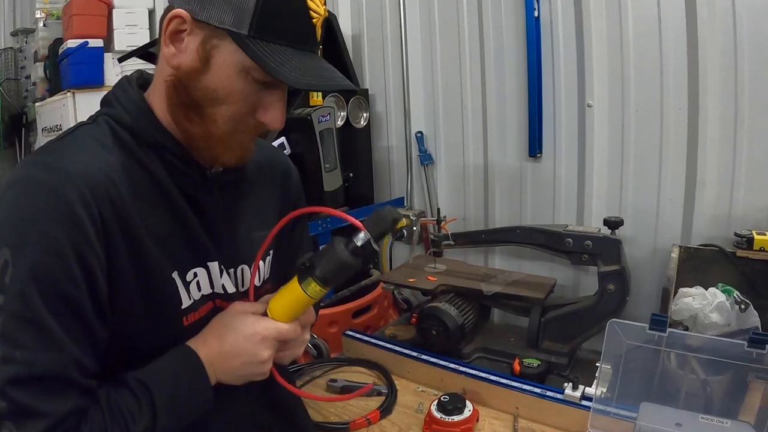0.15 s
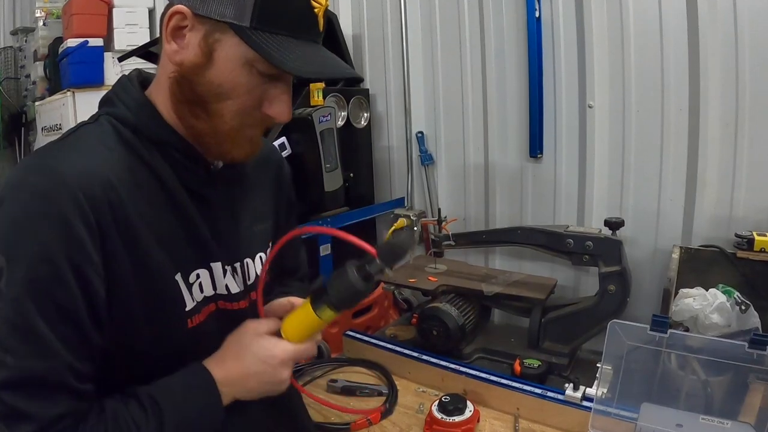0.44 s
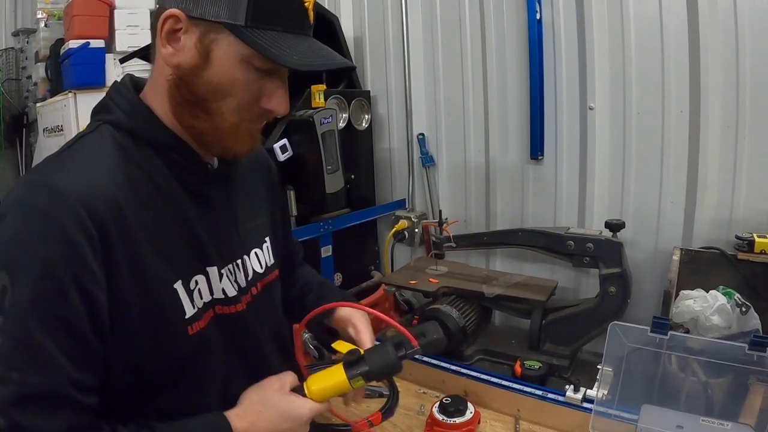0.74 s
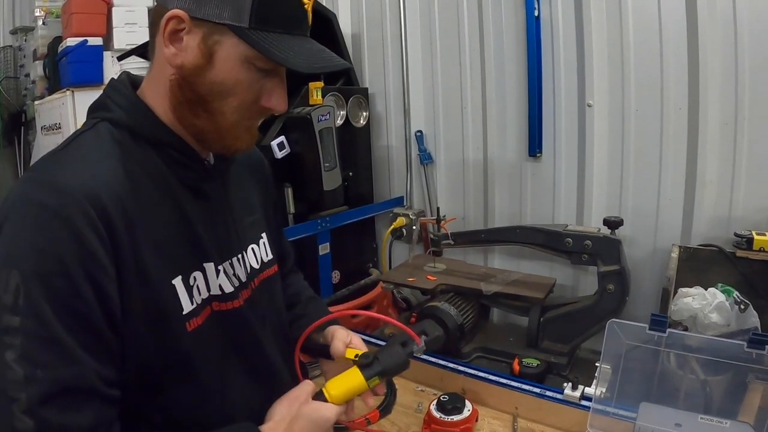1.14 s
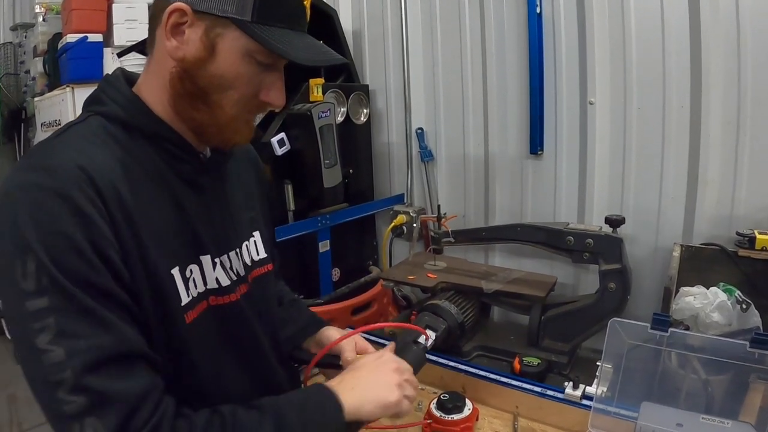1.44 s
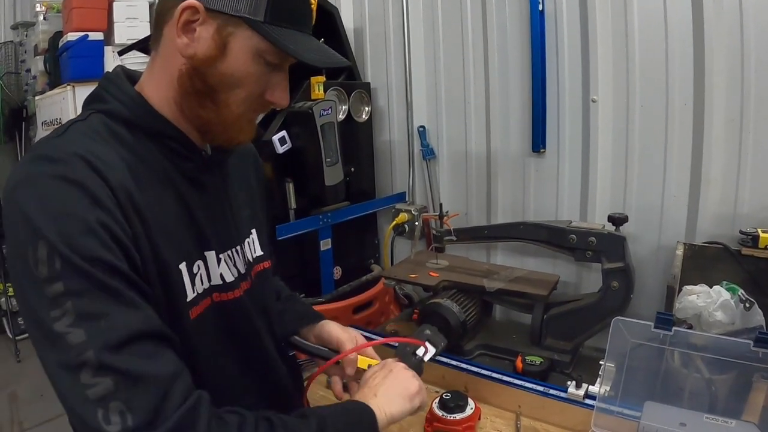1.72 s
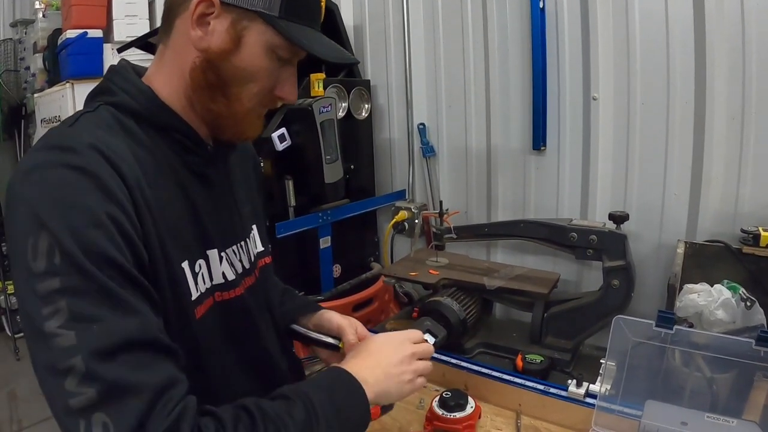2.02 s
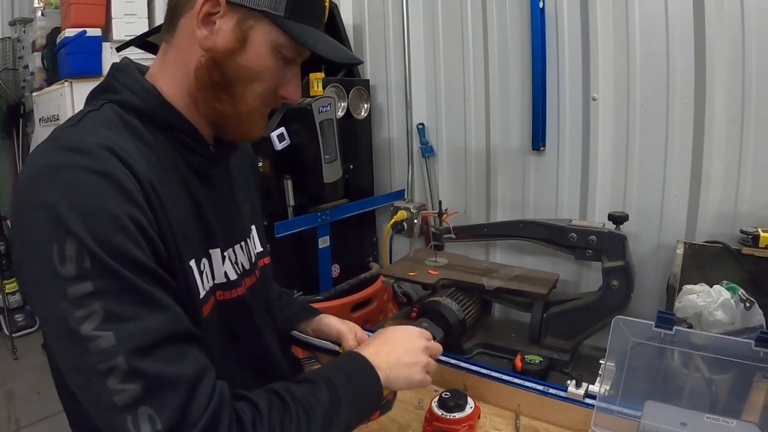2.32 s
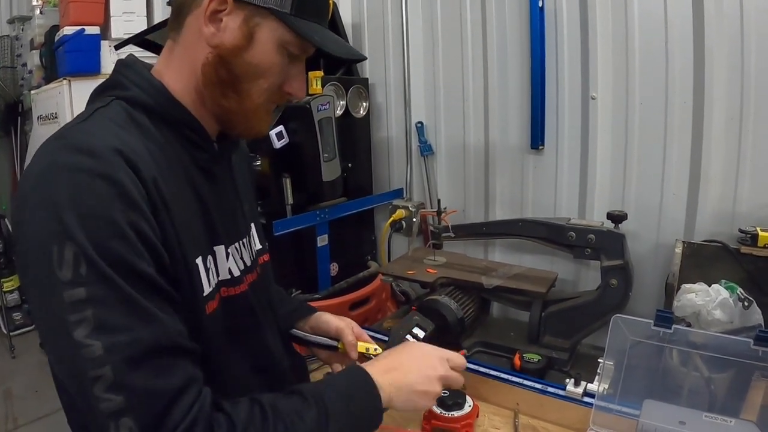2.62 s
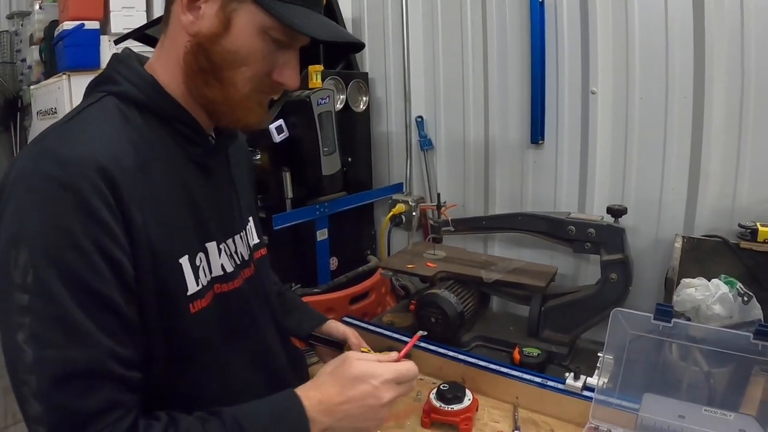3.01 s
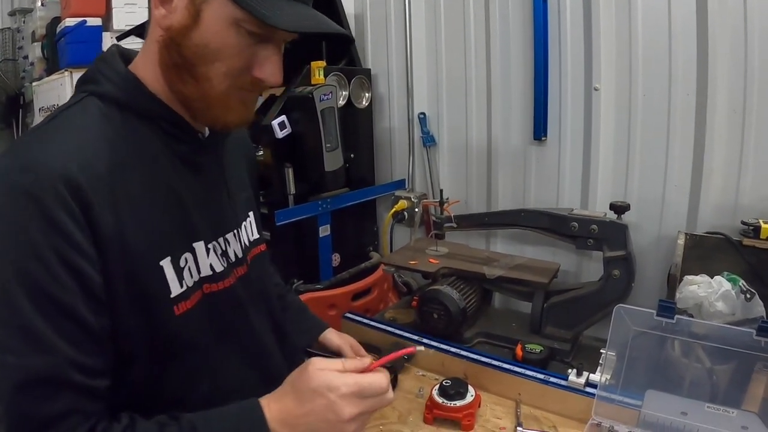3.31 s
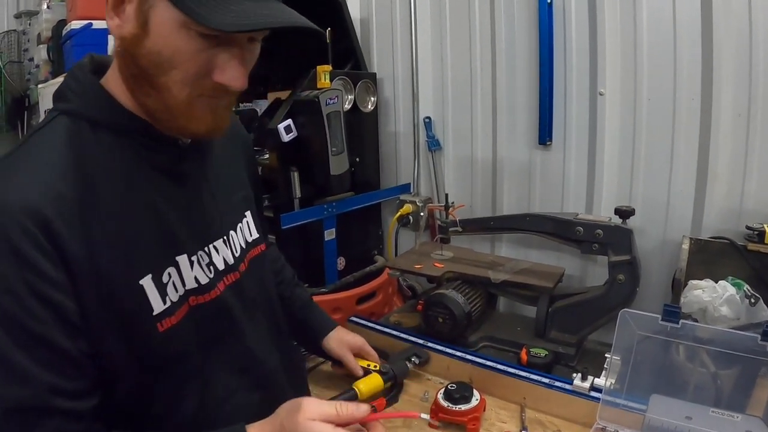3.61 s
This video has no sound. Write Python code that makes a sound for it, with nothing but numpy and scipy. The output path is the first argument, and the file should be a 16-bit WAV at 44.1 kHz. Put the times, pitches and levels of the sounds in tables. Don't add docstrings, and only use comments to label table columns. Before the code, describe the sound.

A hydraulic hand crimper clicks, clacks sharply, squeals on release, then clanks on a wooden bench

```python
import sys
import numpy as np
from scipy import signal
from scipy.fft import rfft, irfft
from scipy.io import wavfile
from scipy.ndimage import uniform_filter1d, map_coordinates

SR = 44100
rng = np.random.default_rng(int(sys.argv[2]) if len(sys.argv) > 2 else 0)


def invert_db(x):
    u = np.asarray(x, float) / 20
    return 10 ** u


def materialize(psi):
    bounded = np.clip(np.atleast_2d(psi).T, -1, 1)
    quanta = np.round(bounded * 32767).astype(np.int16)
    wavfile.write(sys.argv[1], SR, quanta)


N = 165375
TIME = np.arange(N) / SR


def on_log(table, hz):
    table = np.array(table)
    return np.interp(np.log(hz), np.log(table[:, 0]), table[:, 1])


def unit(x):
    return x / np.sqrt(np.mean(x ** 2))


def walk(rate):
    k = int(SR / rate)
    steps = np.repeat(rng.standard_normal(N // k + 1), k)
    return 1.2 * uniform_filter1d(uniform_filter1d(steps, k), k)[:N]


def bands(size, step):
    f = np.fft.rfftfreq(size, 1 / SR) + 1
    for hz in 25 * 2 ** np.arange(0, 9.4, step):
        power = np.maximum(1 - np.abs(np.log2(f / hz)) / step, 0)
        yield hz, irfft(rfft(rng.standard_normal(size)) * np.sqrt(power), size)


def ring(modes, crack, tilt_db, ring_scale, crack_db, crack_cycles, vary_db):
    t = np.arange(int(0.25 * SR)) / SR
    mode_hz, width, mode_db = np.array(modes, float).T
    crack_hz = np.geomspace(crack[0][0], min(crack[-1][0], 0.4 * SR), num=40)
    detune, vary, sign = rng.standard_normal((3, len(mode_hz) + 40))

    decay = np.r_[np.pi * width / ring_scale, crack_hz / crack_cycles + 150]
    spread = np.r_[np.full(len(mode_hz), 0.008), np.full(40, 0.04)]
    f = np.r_[mode_hz, crack_hz] * (1 + spread * detune)

    db = np.r_[mode_db - mode_db.max(), on_log(crack, crack_hz) + crack_db]
    strongest_hz = mode_hz[mode_db.argmax()]
    db = db + vary_db * vary + tilt_db * np.log2(f / strongest_hz)
    gain = invert_db(db) * np.sqrt(decay) * np.r_[np.sqrt(width), np.sqrt(crack_hz / 8)] * np.sign(sign)
    return gain @ (np.exp(-decay[:, None] * t) * np.sin(2 * np.pi * f[:, None] * t))


def hits(events, modes, crack, ring_scale, crack_db, crack_cycles, vary_db, rattle_s):
    out = np.zeros(N + SR)
    for s, db, tilt_db in events:
        when, size = rng.random((2, 6))
        push = np.zeros(SR // 20)
        push[0] = 0.65
        chatter_at = (rattle_s * 2 * when * SR).astype(int)
        np.add.at(push, chatter_at, (2 * size - 1) * np.exp(-2 * when))
        body = ring(modes, crack, tilt_db, ring_scale, crack_db, crack_cycles, vary_db)
        y = signal.fftconvolve(push, body)
        i = int(s * SR)
        out[i:i + len(y)] += y * invert_db(db) / np.abs(y).max()
    return out[:N]


# (frequency [Hz], density [dB per Hz])
SHED_AIR = [(15, -50), (25, -20.5), (164, -6), (460, -26.5), (616, -15.5), (1190, -12), (2500, -21.5),
            (12300, -45.5), (14000, -57.5)]
# (frequency [Hz], level [dB])
FAN_HUM = [(120, -67), (157, -74.5)]


def shed_murmur():
    swell = walk(1.9)
    air = 0
    for hz, noise in bands(N, 1 / 2):
        air = air + invert_db(on_log(SHED_AIR, hz) + 0.46 * swell + 3.0 * walk(22)) * noise
    hum = 0
    for hz, db in FAN_HUM:
        hum = hum + invert_db(db + 0.5 + 2.2 * walk(15)) * np.sin(2 * np.pi * hz * TIME)
    return unit(air) * invert_db(-60.5) + hum


# (time [s], peak level [dB], tilt [dB per octave])
PUMP_CLICKS = [(0.5563, -20.5, 4), (0.5633, -30.5, 0), (0.5766, -25, -1.5), (0.5844, -33.5, -3),
               (0.5916, -20, -2), (0.5975, -23.5, 3), (0.6761, -26, -0.5), (0.6831, -28.5, -9),
               (0.6882, -28.5, -3.5), (0.7199, -34, 4), (0.781, -55, 1.5), (1.2358, -32.5, 5.5),
               (1.2464, -27, -3), (1.2945, -40, 3.5), (1.736, -36.5, 0.5), (1.7856, -45, -6),
               (2.4823, -32.5, -8.5), (3.2957, -21, -18), (3.513, -20.5, -13), (3.6016, -28.5, -6),
               (3.6174, -32.5, -6.5), (3.713, -33, -5), (3.7272, -36.5, -7)]
# (frequency [Hz], width [Hz], level [dB])
PUMP_MODES = [(1286, 130, -1), (1808, 29, 1.5), (2610, 70, 1), (4000, 54, -10.5), (4470, 170, -5.5),
              (4850, 44, -5), (5006, 92, -1.5), (9400, 91, -19.5)]
# (frequency [Hz], density [dB per Hz])
PUMP_CRACK = [(290, -32.5), (500, -16.5), (4540, -1), (11400, -41), (15000, -57)]


def pump_clicks():
    return hits(PUMP_CLICKS, PUMP_MODES, PUMP_CRACK, ring_scale=1.3, crack_db=-7.5, crack_cycles=6.5,
                vary_db=7.9, rattle_s=0.0023)


# (time [s], peak level [dB], tilt [dB per octave])
DIE_CLACKS = [
    (0.9634, -27.5, 0),
    (0.9703, -9, 0),
    (0.9753, -6, 0),
    (0.9776, -2.5, 0),
    (1.072, -23, 0),
]
# (frequency [Hz], width [Hz], level [dB])
DIE_MODES = [(1817, 87, -27), (3144, 47, 4), (3763, 81, 4), (4230, 30, -1.5), (4330, 31, -8.5),
             (4440, 100, -2), (5084, 35, -8.5), (5780, 72, -8), (6300, 24, -12), (6900, 45, -9),
             (8500, 160, -23.5), (10930, 37, -17)]
# (frequency [Hz], density [dB per Hz])
DIE_CRACK = [(180, -63.5), (300, -40), (1820, -9.5), (2360, -30.5), (4390, -4), (15000, -47)]


def die_clacks():
    return hits(DIE_CLACKS, DIE_MODES, DIE_CRACK, ring_scale=0.92, crack_db=-11.0, crack_cycles=11.0,
                vary_db=6.1, rattle_s=0.004)


# (time [s], peak level [dB], tilt [dB per octave])
HANDLE_KNOCKS = [(1.077, -49, 0), (1.246, -41, 0), (2.185, -6, 0.0032), (2.197, -18, 0.0076),
                 (2.356, -20, 0), (2.565, -9.5, 0), (2.657, -5.5, 0.045), (2.787, -27, 0), (3.272, -8, 0),
                 (3.356, -9.5, 0), (3.365, -31, 0), (3.512, -15, 0), (3.668, -28.5, 0), (3.685, -25, 0)]
# (frequency [Hz], width [Hz], level [dB])
HANDLE_MODES = [(570, 14.6, 7), (1625, 48, -23), (1724, 21, -17), (2445, 65, -24.5), (2785, 19.5, -10),
                (3390, 86, -33)]
# (frequency [Hz], density [dB per Hz])
HANDLE_CRACK = [(120, -27), (200, -19), (561, 4), (2530, -21.5), (10000, -73), (13000, -83), (22000, -120)]


def handle_knocks():
    return hits(HANDLE_KNOCKS, HANDLE_MODES, HANDLE_CRACK, ring_scale=0.49, crack_db=-14.0, crack_cycles=7.3,
                vary_db=2.14, rattle_s=0.004)


# (time [s], pitch [Hz], whistle level [dB], hiss level [dB])
VALVE = [
    (1.974, 651, -76.5, -72),
    (1.99, 623, -36.5, -41),
    (2.002, 912, -46.5, -42.5),
    (2.018, 868, -32.5, -42.5),
    (2.032, 543, -26, -31.5),
    (2.061, 467, -32, -37),
    (2.1, 485, -43.5, -39.5),
    (2.14, 437, -73, -43.5),
    (2.229, 433, -96, -61),
]
# (frequency [Hz], density [dB per Hz])
OIL_JET = [(710, -59), (1200, -8), (2950, -11), (5160, 0), (9320, -7), (15000, -42)]
# (time [s], pitch [Hz], level [dB])
SEAT_CHIRPS = [
    (1.2, 1400, -28),
    (3.8, 770, -35),
    (1.992, 5900, -43),
    (2.03, 5200, -24),
]


def release_valve():
    s, hz, whistle_db, hiss_db = np.array(VALVE).T
    pitch = uniform_filter1d(np.interp(TIME, s, hz), size=200) * (1 + 0.015 * walk(99))
    phase = 2 * np.pi * np.cumsum(pitch) / SR
    whistle = np.sin(phase) + invert_db(-22.5) * np.sin(1.7 * phase)
    whistle = whistle * invert_db(np.interp(TIME, s, whistle_db, -140, -140) + 3 + 1.0 * walk(80))

    hiss = 0
    for band_hz, noise in bands(N, 1 / 2):
        if band_hz > 900:
            hiss = hiss + invert_db(on_log(OIL_JET, band_hz) + 2.2 * walk(59.72)) * noise
    hiss = unit(hiss)
    fall_per_s = 1.3
    lag = SR / 620 * (1 + fall_per_s * np.clip(TIME - s[0], 0, 1))
    for turn in (1, 2):
        hiss = hiss + invert_db(-10) * map_coordinates(hiss, [np.arange(N) - turn * lag], order=3, mode="mirror")
    hiss = unit(hiss) * invert_db(np.interp(TIME, s, hiss_db, -140, -140))

    chirps, chirp_s = 0, 0.0052
    for at, chirp_hz, db in SEAT_CHIRPS:
        swell = np.exp(-((TIME - at) / chirp_s) ** 2)
        chirps = chirps + invert_db(db) * swell * np.sin(2 * np.pi * chirp_hz * TIME)
    return whistle + chirps + hiss


# (time [s], rubbing level [dB])
ROLL = [(2.15, -78), (2.2, -30.5), (2.36, -29), (2.41, -50), (2.5, -31), (2.8, -57), (3.1, -63),
        (3.22, -35), (3.4, -29), (3.48, -45), (3.6, -33.5), (3.75, -46)]


def rolling():
    ticks_per_s = 200
    ticking = rng.random(N) < ticks_per_s / SR
    ticks = ticking * invert_db(6.9 * rng.exponential(size=N)) * np.sign(rng.standard_normal(N))
    bench = ring(BENCH_MODES, BENCH_CRACK, tilt_db=1.0, ring_scale=1.0, crack_db=0.0, crack_cycles=9.8,
                 vary_db=0.61)
    handle = ring(HANDLE_MODES, HANDLE_CRACK, tilt_db=-0.97, ring_scale=0.82, crack_db=0.0, crack_cycles=6.2,
                  vary_db=1.5)
    body = unit(bench) + invert_db(-14.5) * unit(handle)
    s, db = np.array(ROLL).T
    return unit(signal.fftconvolve(ticks, body)[:N]) * invert_db(np.interp(TIME, s, db, -140))


# (time [s], peak level [dB], tilt [dB per octave])
HEAD_CLANKS = [
    (2.163, -11.5, 0),
    (2.54, -6, 0.007),
    (2.585, -12, 0.0096),
    (2.887, -6, 0),
    (2.898, -10, 0),
]
# (frequency [Hz], width [Hz], level [dB])
HEAD_MODES = [(1194, 45, 3), (1615, 16, -17), (2600, 210, -9.5), (3298, 62, -13), (3472, 72, -14.5),
              (3897, 89, -11.5), (4700, 390, -16.5), (5800, 53, -24.5), (6790, 43, -24.5),
              (7230, 140, -26.5)]
# (frequency [Hz], density [dB per Hz])
HEAD_CRACK = [(180, -37), (300, -22.5), (1210, -2.5), (10500, -42), (15000, -73)]


def head_clanks():
    return hits(HEAD_CLANKS, HEAD_MODES, HEAD_CRACK, ring_scale=0.66, crack_db=-11.5, crack_cycles=6.2,
                vary_db=3.3, rattle_s=0.0055)


# (time [s], peak level [dB], tilt [dB per octave])
BENCH_THUDS = [(2.167, -23.5, 0), (2.215, -30, 0), (2.271, -16.5, 0.045), (2.302, -20, 0.045),
               (2.328, -24.5, 0), (2.442, -35.5, 0.011), (2.549, -20, 0), (2.566, -22.5, 0),
               (2.885, -13, 0), (3.184, -15, 0), (3.193, -16.5, 0), (3.213, -16, 0), (3.283, -10, 0.011),
               (3.334, -26.5, 0.0037), (3.524, -15.5, 0), (3.568, -41, 0)]
# (frequency [Hz], width [Hz], level [dB])
BENCH_MODES = [(181, 160, -18), (548, 54, -5), (852, 270, 7)]
# (frequency [Hz], density [dB per Hz])
BENCH_CRACK = [(35, -52), (60, -30), (167, 17), (642, -2.5), (6000, -53.5), (7800, -96), (13200, -120)]


def bench_thuds():
    return hits(BENCH_THUDS, BENCH_MODES, BENCH_CRACK, ring_scale=1.5, crack_db=13.0, crack_cycles=7.4,
                vary_db=6.3, rattle_s=0.008)


# (frequency [Hz], time to fall 60 dB [s])
ROOM_T60 = [(100, 0.51), (1200, 0.73), (4000, 0.79), (8000, 0.58), (14000, 0.3)]


def room(x):
    build_s, bass_hz = 0.0049, 251
    t = np.arange(SR * 3 // 2) / SR
    tail = 0
    for hz, noise in bands(len(t), 1 / 2):
        decay = np.exp(-np.log(1000) * t / on_log(ROOM_T60, hz))
        tail = tail + noise * decay * hz / np.hypot(hz, bass_hz)
    tail = tail * (1 - np.exp(-(t / build_s) ** 2))
    tail = tail / np.sqrt(np.sum(tail ** 2))
    return x + invert_db(-12) * signal.fftconvolve(x, tail)[:N]


def scene():
    tool = pump_clicks() + die_clacks() + handle_knocks() + release_valve() + head_clanks()
    bench = rolling() + bench_thuds()
    return (shed_murmur() + room(tool + bench))[None]


def roll_off(x):
    return signal.sosfilt(signal.butter(12, 15620, fs=SR, output="sos"), x)


def record(dry):
    return roll_off(dry)


dry = scene()
out = record(dry)
materialize(out)
```